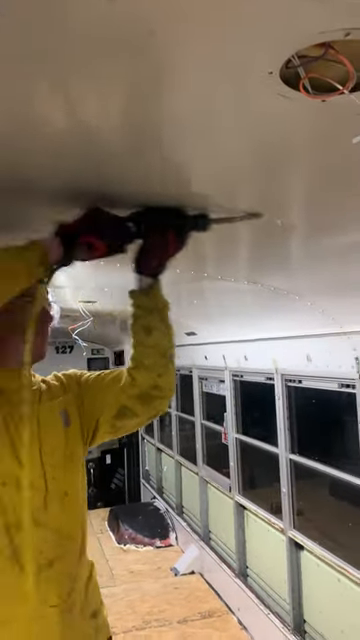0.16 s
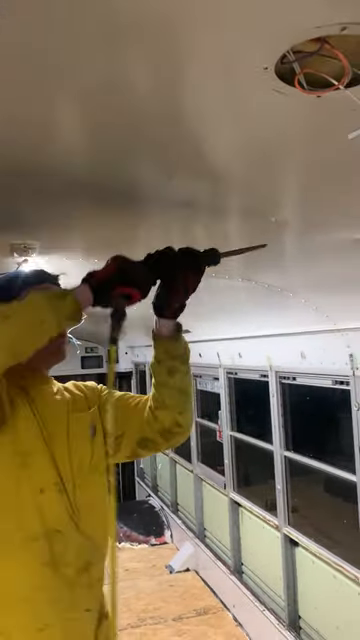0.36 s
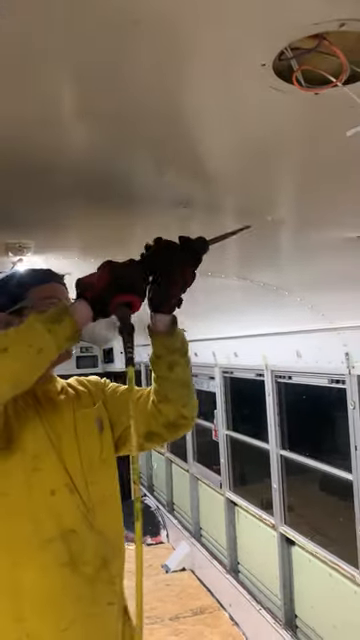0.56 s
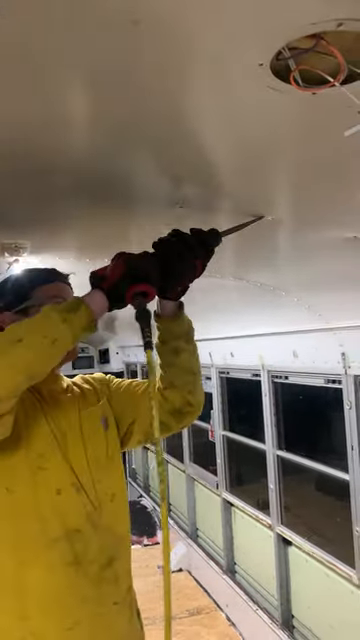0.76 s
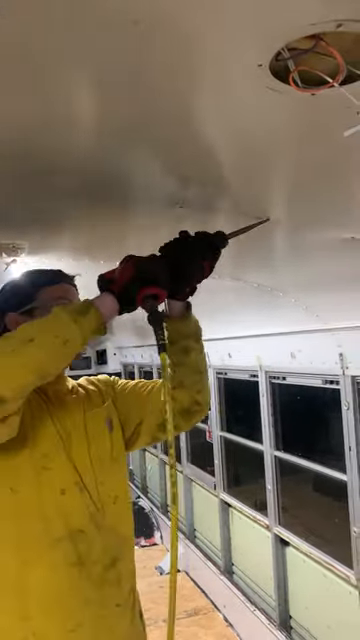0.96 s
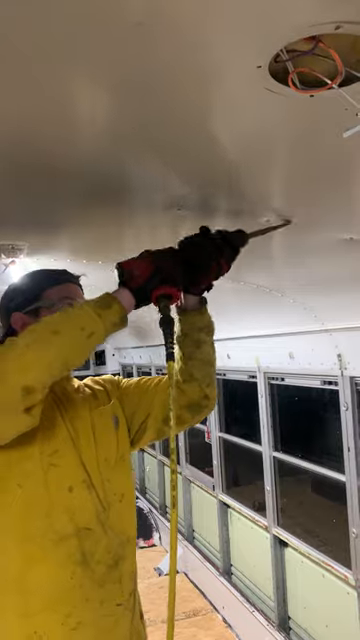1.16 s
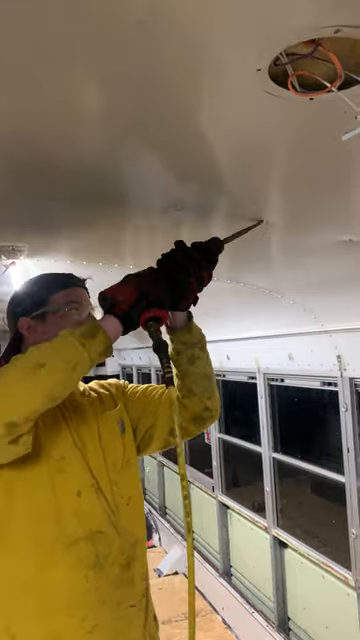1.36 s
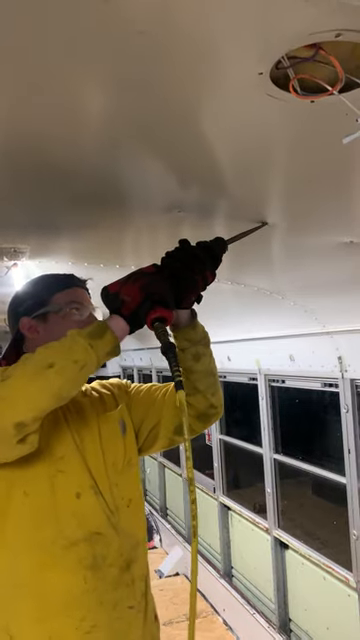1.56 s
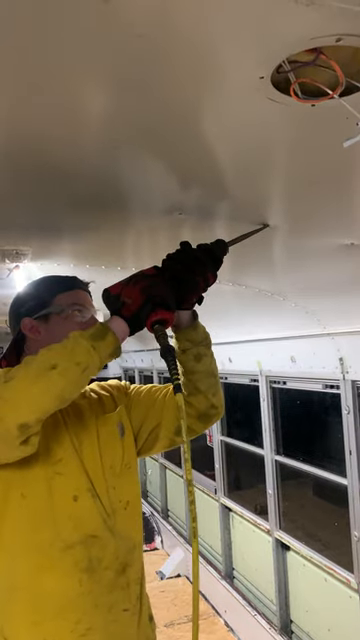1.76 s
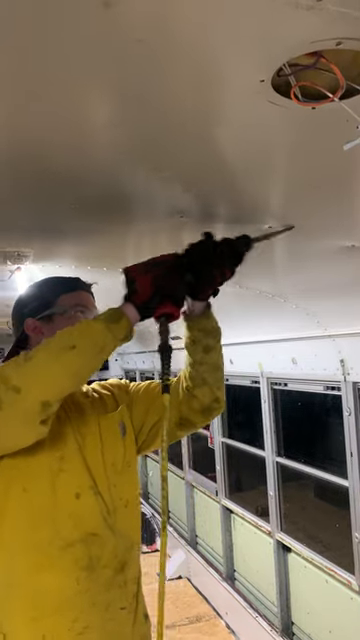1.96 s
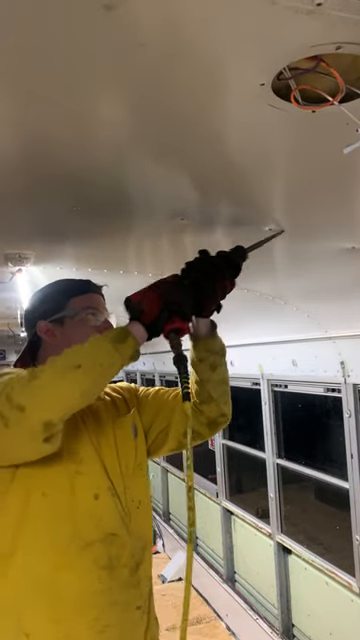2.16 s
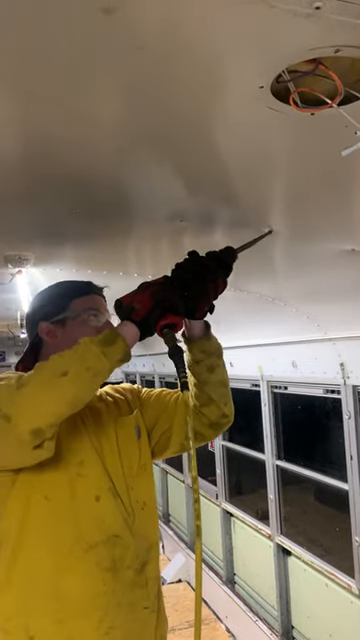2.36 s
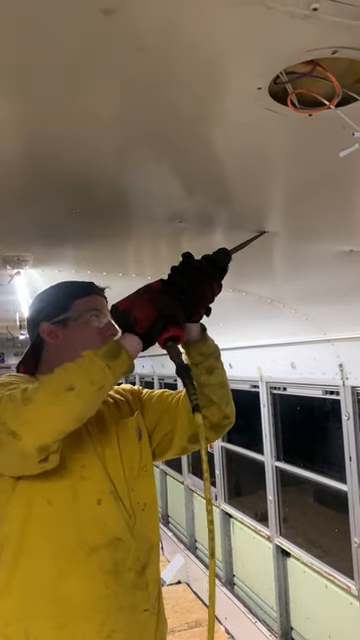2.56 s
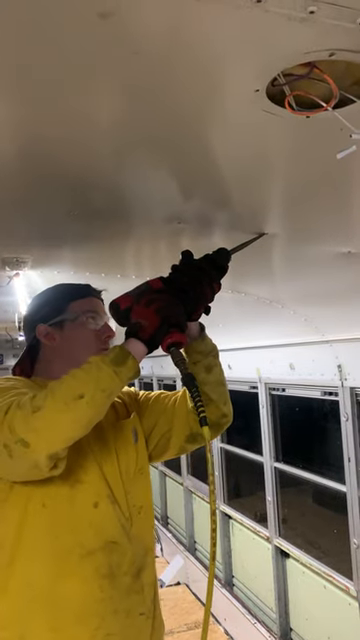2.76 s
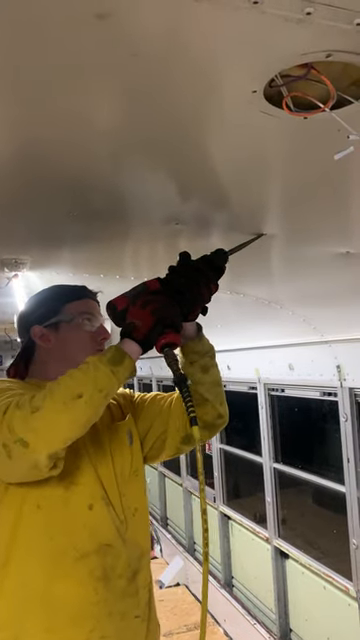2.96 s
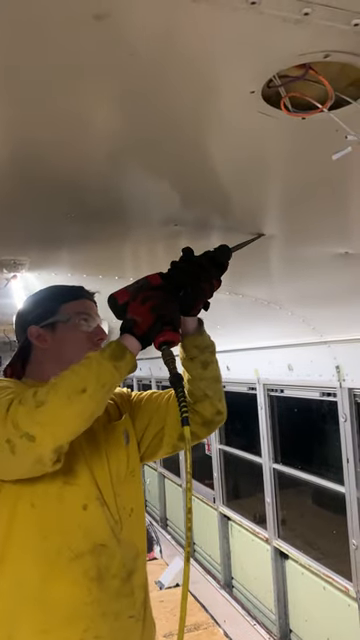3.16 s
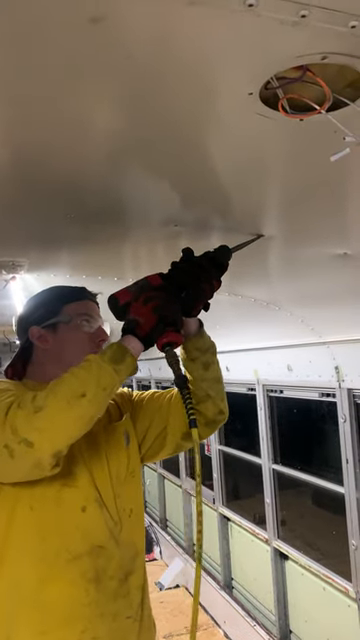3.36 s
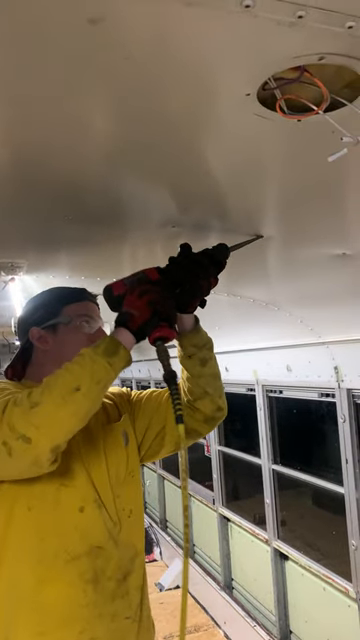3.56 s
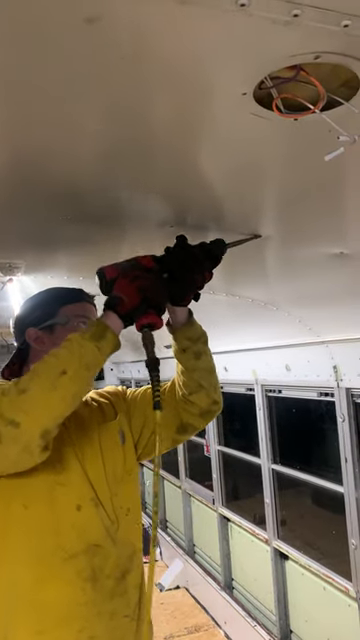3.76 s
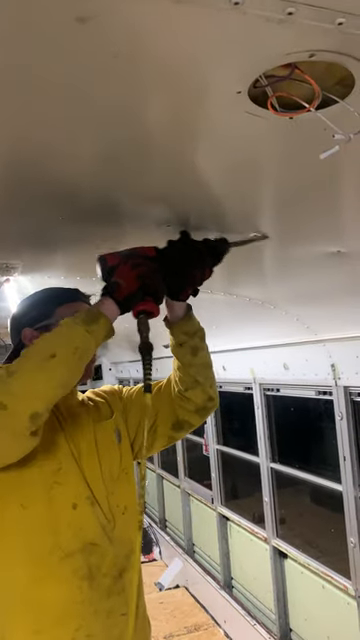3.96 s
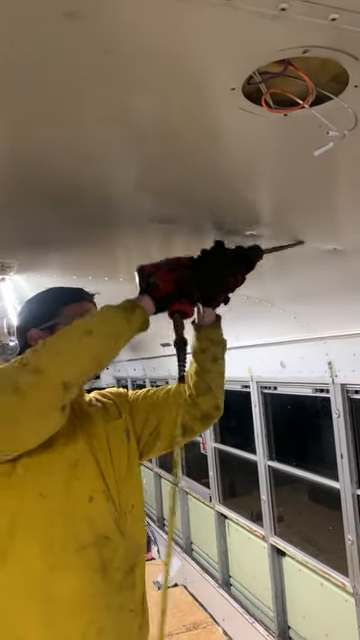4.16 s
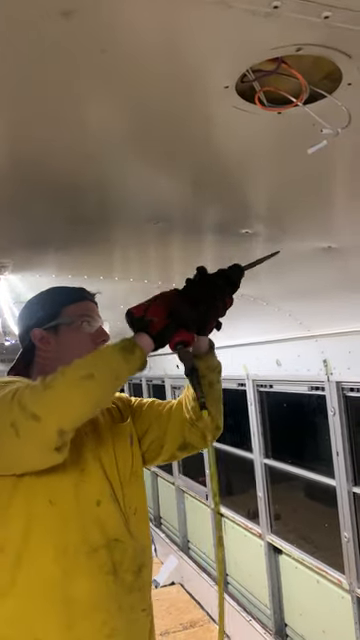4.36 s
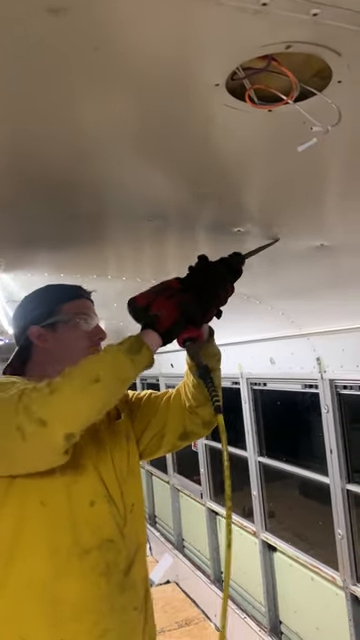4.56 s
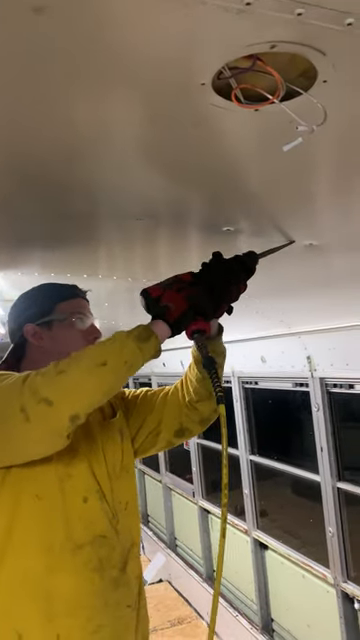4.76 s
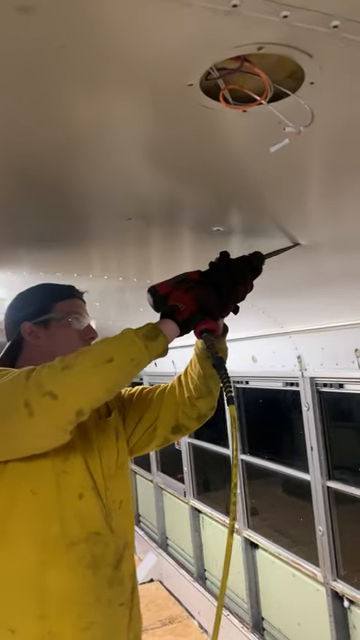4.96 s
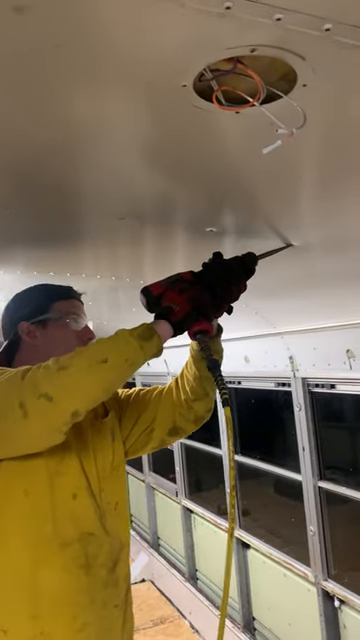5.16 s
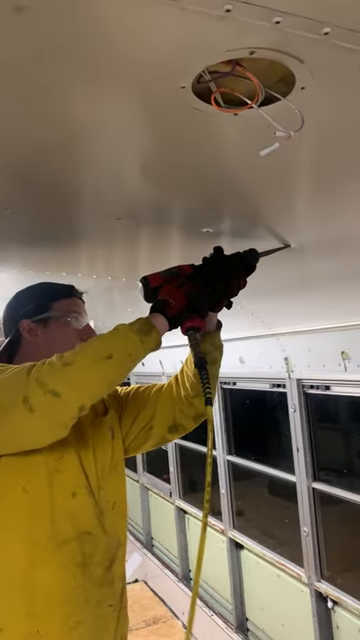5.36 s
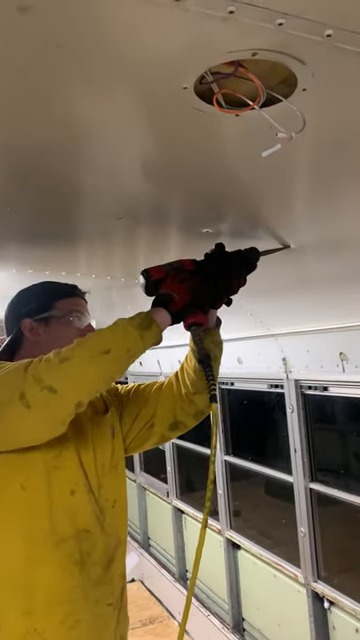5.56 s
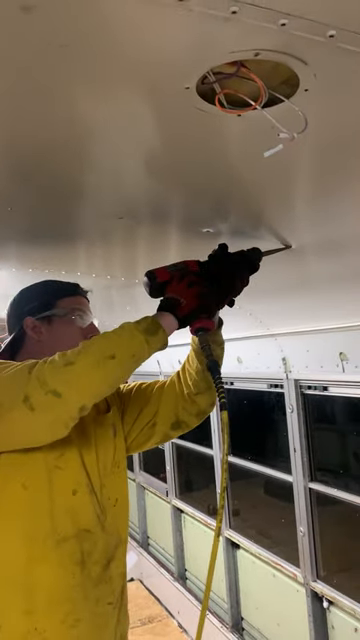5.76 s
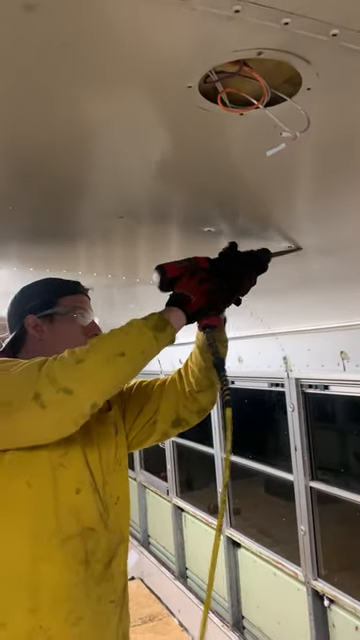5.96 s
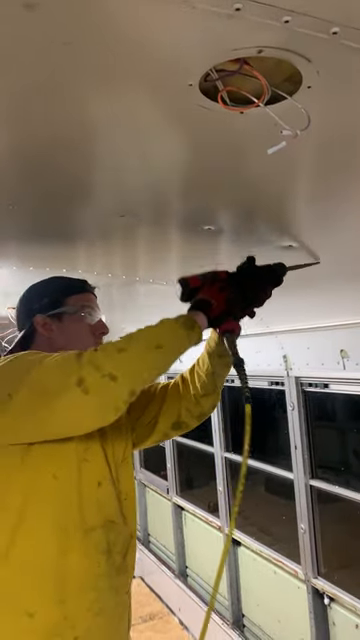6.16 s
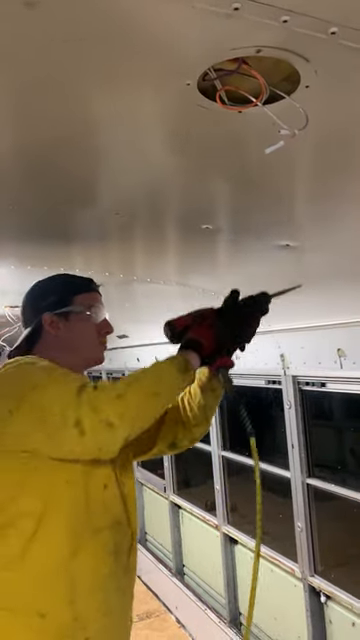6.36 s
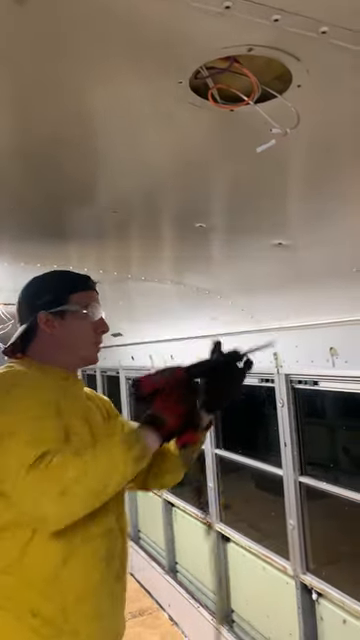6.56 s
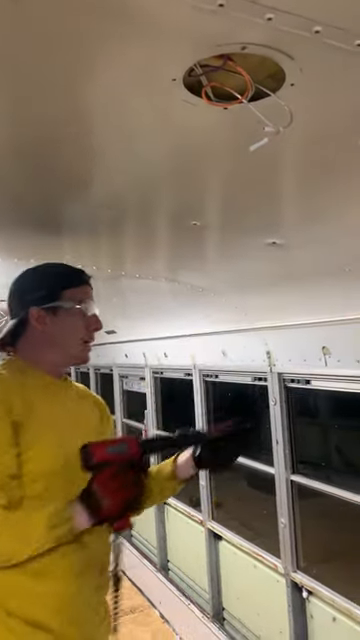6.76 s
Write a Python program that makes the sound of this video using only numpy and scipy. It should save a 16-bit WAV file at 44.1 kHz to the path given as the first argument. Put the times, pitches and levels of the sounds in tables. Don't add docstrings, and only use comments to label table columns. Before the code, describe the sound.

An air hammer rattles in harsh metallic bursts against a booming sheet-steel roof, with hisses, bit ticks and small metal pieces landing between.

```python
import sys
import numpy as np
from scipy import signal
from scipy.fft import rfft, irfft, next_fast_len
from scipy.io import wavfile
from scipy.ndimage import uniform_filter1d, map_coordinates

SR = 44100
rng = np.random.default_rng(int(sys.argv[2]) if len(sys.argv) > 2 else 0)


def undo_db(level):
    steps = np.asarray(level, float) / 20
    return 10 ** steps


def file_out(sig):
    cols = np.atleast_2d(sig).T
    lim = np.clip(cols, -1, 1)
    pcm = np.round(lim * 32767).astype(np.int16)
    wavfile.write(sys.argv[1], SR, pcm)


N = 300762
HOP = 64
STROKE_S = 0.033

# first blow in seconds, last blow in seconds, crack peak in dB,
# crack change in dB per blow, push on the roof in dB.
PULLS = [(0.159, 0.2161, -19.5, 1, -27), (3.457, 3.5586, -6, 0, -17.5), (3.6769, 3.8074, -6, -0.15, -19),
         (3.9207, 3.987, -4, 0, -18), (5.3643, 5.3935, -2, -2.5, -15.5), (5.664, 5.728, -2.5, -1, -16),
         (5.9288, 5.9962, -5.5, 0, -19)]
# time in seconds, crack peak in dB, push on the roof in dB.
STRAY_BLOWS = [(0.0489, -17, -21), (0.0828, -6, -19.5), (0.1218, -7, -19.5), (0.255, -15.5, -27.5),
               (1.8578, -22.5, -26), (1.8962, -12, -23.5), (1.9298, -12, -25.5), (1.9568, -5.5, -16.5),
               (1.9934, -6, -20.5), (2.0304, -15.5, -33), (2.0643, -14, -35.5), (3.1013, -31.5, -34.5),
               (3.1237, -28, -29), (3.1462, -10, -25.5), (3.1807, -7, -15.5), (3.2101, -8.5, -16.5),
               (3.2491, -12, -18.5), (3.6089, -11.5, -24), (4.0248, -12.5, -20), (4.151, -14, -25),
               (4.1908, -17, -40.5), (5.2599, -20.5, -29.5), (5.2861, -19, -32), (5.3034, -10.5, -22),
               (5.3336, -3.5, -12.5), (5.766, -11, -23), (5.892, -4.5, -15), (6.1399, -13.5, -22)]
# work begins in seconds, clang in dB above the push, drum in dB above the push.
RIVETS = [
    (0, -6, -7),
    (1.8, -5.5, -1),
    (3, -3, 0),
    (3.85, -4.5, -4),
    (5.2, -3, -15.5),
]
# frequency in Hz, level in dB.
CRACK = [(1500, -4.5), (3500, -7), (5200, 2.5), (6900, -3.5), (8600, 1.5), (10700, -2), (13500, -4),
         (15000, 9.5), (15400, 5.5), (15650, 10.5)]
# frequency in Hz, level in dB.
CLANG = [(250, -31), (500, -4.5), (1100, -4), (1600, -8), (2400, -10.5), (3300, -10.5), (5000, -26.5)]
# frequency in Hz, level in dB.
BOOM = [(42, -51), (62, -18), (93, -6.5), (130, -6), (160, -17), (200, -5), (330, -7.5), (450, -12.5),
        (900, -44.5)]
# frequency in Hz, level in dB, time to fall 60 dB in seconds.
PANELS = [(55, -23, 0.29), (89, -12.5, 0.53), (131.5, -1.5, 0.33), (244, -7, 0.043), (309.7, -3.5, 0.19),
          (355.5, -2.5, 0.1), (395.3, -5, 0.23)]
# frequency in Hz, level in dB, time to fall 60 dB in seconds.
DRUM = [(186.2, 1, 0.084), (218.8, 1, 0.074)]
# frequency in Hz, level in dB, time to fall 60 dB in seconds.
CHISEL = [(3670, -15.5, .04), (6600, -10.5, 0.034), (7500, -12.5, 0.013), (8540, -4, 0.036),
          (10400, 0.5, 0.033), (12270, 0, 0.039), (14500, 3, .03)]
# time in seconds, crack peak in dB, clang in dB above the crack,
# cabin share in dB, tone in Hz.
TICKS = [(0.528, -42, -42, -1, 8360), (0.5643, -47, -18.5, -1, 12500), (0.6908, -28, -16, -5.5, 7700),
         (1.1215, -53.5, -6, -4, 6680), (1.351, -51, -12, -5, 7510), (1.374, -50, -9, 0, 6530),
         (0.263, -24.5, -49, -20, 7500), (1.403, -46.5, -17.5, 3, 4110), (4.2556, -17, -20.5, -5.5, 4150),
         (4.5393, -45.5, -17.5, -2.5, 6800), (4.679, -38, -15, 3.5, 6540), (4.8457, -33.5, -19, -2.5, 6370),
         (5.0043, -46, -1, -15, 6720), (5.0994, -69, 1, 0, 12500), (5.1179, -51.5, -6.5, -5, 6080),
         (5.172, -39.5, -17, -9, 6840), (6.1974, -23.5, -40, -5.5, 7800)]
# time in seconds, crack peak in dB,
# rebound share from 0 to 1, cabin share in dB, tone in Hz.
HEADS = [
    (0.3611, -20, 0.1, -4, 11700),
    (4.0704, -11.5, 0.3, -7.5, 12900),
    (6.4476, -18.5, .9, -4, 6050),
]
# time in seconds, level in dB.
SCUFFS = [(0.8944, -68), (1.0214, -64.5), (1.085, -62.5)]
# frequency in Hz, level in dB.
TICK = [(1000, -20.5), (3000, -3), (6500, 1), (10000, 5.5), (13000, -1), (15500, -16.5)]
# time in seconds, boom peak in dB,
# clang in dB above the boom, crack in dB above the boom.
KNOCKS = [(0.693, -60.5, -5, 18), (0.772, -41, -6.5, -15), (0.948, -43.5, -8.5, -21.5),
          (1.127, -36.5, -17, -38), (1.355, -45.5, -6, 17), (1.409, -46.5, 2, -21), (1.6, -34.5, -9, -15),
          (2.699, -72, 7, -25.5), (2.715, -44.5, -7, -1), (4.539, -41.5, -3, -27),
          (4.679, -52.5, -18, 26.5), (4.844, -53, -5, 21), (4.965, -38.5, -1, 5.5), (6.446, -60, -4, 22)]
# frequency in Hz, level in dB.
KNOCK = [(300, -8), (600, -5.5), (1200, -3.5), (1550, -9), (1900, -23.5), (5000, -46.5)]
# time in seconds, peak in dB.
THUDS = [(0.049, -58.5), (0.779, -62), (1.146, -52.5), (1.403, -44.5), (1.979, -30), (2.201, -43),
         (4.049, -32.5), (4.2, -47), (4.329, -47.5), (4.598, -51), (5.002, -61.5)]
# start in seconds, level in dB, length in seconds.
PUFFS = [(0.033, -43, 0.0049), (1.838, -56.5, 0.015), (3.083, -56, 0.011), (3.113, -38, .015),
         (3.43, -34, 0.028), (4.124, -34.5, 0.01), (5.241, -52.5, 0.01), (5.274, -40, .015),
         (5.614, -35, 0.051)]
# frequency in Hz, level in dB.
AIR = [(2500, -10.5), (6500, -13), (8500, -11.5), (10800, -3.5), (13000, -16.5), (15500, -23.5)]
# frequency in Hz, time to fall 60 dB in seconds.
CABIN = [(50, 1.0), (120, 0.72), (250, 0.54), (1000, 0.51), (3500, 0.49), (9000, 0.36), (14000, 0.3),
         (15300, 0.13)]
# frequency in Hz, level in dB.
HUM = [(30, -13), (55, 1.5), (95, 1), (170, -18), (260, -28.5), (800, -32.5), (1400, -26.5), (2200, -34),
       (6000, -55), (12000, -63.5)]
# frequency in Hz, level in dB.
WHINE = [(1404, -79.5), (812, -92)]
# frequency in Hz, lead in radians.
LEAD = [(300, 0), (700, 1.3), (1100, 0), (1800, .4), (2300, 3.14), (5500, 3.15), (6300, 5.8), (7500, 6.5),
        (9000, 8.8), (9500, 9.3), (10300, 9.65), (12000, 12.4), (14200, 15.2), (15700, 16.3)]
# frequency in Hz, likeness from 0 to 1.
ALIKE = [(300, .8), (700, .35), (2200, .25), (2700, .68), (3300, .74), (3850, .1), (4600, .86), (5300, .84),
         (5900, .35), (7000, .92), (8600, .8), (9600, .99), (10200, .99), (11000, .8), (14000, .85),
         (14900, .995)]
# frequency in Hz, left minus right in dB.
TILT = [(50, -2), (230, -5.5), (700, 0)]


def hammer():
    s, db, push_db = blows()
    begins, clang_db, drum_db = np.transpose(RIVETS)
    rivet = np.searchsorted(begins, s, side="right") - 1
    luck = rng.standard_normal((len(s), 4))
    scatter_db = 0.5
    clang_db = push_db + clang_db[rivet] + scatter_db * luck[:, 0]
    drum_db = push_db + drum_db[rivet] + scatter_db * luck[:, 1]
    tone_hz = np.where(luck[:, 2] > 0, 6800, 12950) * (1 + 0.06 * luck[:, 3])

    crack = burst(s, db - 8.5, CRACK, rise=0.00013, t60=0.089, grit_db=5.5)
    crack = crack + snap(s, db + 5.5, CRACK) + snap(s + 0.0006, db - 1.5, CRACK)
    sizzle = burst(s, db - 7, CRACK, rise=0.00033, t60=0.08, grit_db=4.0)
    bounces = (s[:, None] + rng.uniform(0.001, 0.02, (len(s), 3))).ravel()
    chatter = burst(bounces, np.repeat(db - 15.0, 3), CRACK, rise=0.00028, t60=0.02, grit_db=1.5)
    sheet = burst(s, clang_db - 13.5, CLANG, rise=0.0022, t60=0.12, grit_db=-6.5)
    sheet = sheet + roof(spikes(s, clang_db - 7.5), CLANG, prompt_db=-1.5, prompt_t60=0.25)

    push = spikes(s, push_db - 12) + spikes(s + 0.01917, push_db - 21.5)
    boom = undo_db(-1) * roof(push, BOOM, prompt_db=0.5, prompt_t60=0.36) + undo_db(3) * panels(push, PANELS)
    boom = boom + panels(spikes(s, drum_db + 2.0), DRUM)
    bit = chisel(s, db - 13.0, tone_hz) * [[1], [0]]
    ring = [(s, db - 7.5, colour(CRACK)), (s, clang_db - 5.5, colour(CLANG))]
    return crack + sizzle + chatter + sheet + boom + bit, ring


def blows():
    rows = list(STRAY_BLOWS)
    for first, last, db, change_db, push_db in PULLS:
        k = np.arange(round((last - first) / STROKE_S) + 1)
        times = first + (last - first) * k / k[-1]
        crack_db = db + change_db * k - 3.5 * (k == 0)
        rows += zip(times, crack_db, push_db - 1 * (k == 0))
    return np.transpose(sorted(rows))


def chisel(times, db, tone_hz):
    t = np.arange(SR // 10) / SR
    mix = rng.standard_normal((len(times), len(CHISEL)))

    def ring(hz, t60):
        return undo_db(-60 * t / t60) * np.sin(2 * np.pi * hz * t) * (1 - np.exp(-t / 0.0015))

    out = 0
    for (hz, level, t60), strength in zip(CHISEL, mix.T):
        out = out + signal.fftconvolve(spikes(times, db + level + 5 * strength), ring(hz, t60))
    for s, size, hz in zip(times, undo_db(db + 12), tone_hz):
        out[round(s * SR):][:len(t)] += size * ring(hz, 0.014)
    return out[:N]


def roof(push, spectrum, prompt_db, prompt_t60):
    hz, t, z = signal.stft(noise(spectrum)[:, :SR], SR, nperseg=1024, noverlap=896)
    fade = undo_db(-60 * t / along(CABIN, hz)[:, None])
    answer = signal.istft(z * fade, SR, nperseg=1024, noverlap=896)[1]
    t = np.arange(answer.shape[1]) / SR
    prompt = 1 + undo_db(prompt_db - 60 * t / prompt_t60)
    answer = answer * prompt * (1 - np.exp(-t / 0.005))
    return signal.fftconvolve(push[None], answer, axes=1)[:, :N]


def panels(push, modes):
    t = np.arange(SR // 2) / SR
    ring = 0
    for hz, db, t60 in modes:
        ring = ring + undo_db(db - 60 * t / t60) * np.sin(2 * np.pi * (hz * t + rng.random((2, 1))))
    swelling = ring * (1 - np.exp(-t / 0.0027))
    return signal.fftconvolve(push[None], swelling, axes=1)[:, :N] * np.array([[1], [0.8]])


def ticks():
    rows = [(*row, 0.11) for row in TICKS]
    rows += [(s, db, -25, wet, hz, share) for s, db, share, wet, hz in HEADS]
    s, db, clang, wet, tone_hz, rebound = np.transpose(rows)
    tick = 0
    for lag, drop in [(0, -0.5), (0.0009, 3), (0.0027, -3.5), (0.0036, 0.5)]:
        tick = tick + burst(s + lag, db + drop, TICK, rise=0.0003, t60=0.0046, grit_db=1.0)
    scrape = burst(s - 0.012, db - 23, AIR, rise=0.023, t60=0.11, grit_db=7.0)
    contact = snap(s, db + 6, TICK) + snap(s + 0.00083, db + 4.5, TICK)
    steel = colour([(800, -9.5), (2200, -1.5), (4500, 1), (8000, -31)])

    def comb(hz):
        return abs(1 + np.clip(rebound, 0, 1) * np.exp(2j * np.pi * hz * 0.0011))

    def bright(hz):
        tone = 0.8 / (1 + ((hz - tone_hz) / 1200) ** 2)
        return comb(hz) / (1 + (hz / 9000) ** 2) * (colour(TICK)(hz) + tone)

    def body(hz):
        return comb(hz) * steel(hz)

    ring = [(s, db - 15.5 + wet, bright), (s, db + clang + 5.5 + wet, body)]
    return tick + scrape + contact, ring + [(*np.transpose(SCUFFS), steel)]


def knocks():
    s, db, clang, crack = np.transpose(KNOCKS)
    knock = burst(s, db + clang - 9.0, KNOCK, rise=0.0019, t60=0.021, grit_db=6)
    knock = knock + roof(spikes(s, db - 14), BOOM, prompt_db=-18, prompt_t60=0.1)
    knock = knock + panels(spikes(s, db - 12.5), PANELS + DRUM)
    t = np.arange(SR // 2) / SR
    floor = np.sin(2 * np.pi * 52 * t) * undo_db(-60 * t / 0.51) * (1 - np.exp(-t / 0.017))
    thud = signal.fftconvolve(spikes(*np.transpose(THUDS)), undo_db(7.5) * floor)[:N] * np.array([[1], [0]])
    treble = colour([(1500, -3), (3500, -1), (7000, -6.5), (14000, -46)])
    return knock + thud, [(s, db + clang - 6.0, colour(KNOCK)), (s, db + crack - 25, treble)]


def puffs():
    t = np.arange(N) / SR
    flow = 0
    for s, db, length in PUFFS:
        fade = undo_db(-60 * np.maximum(t - s - length, 0) / 0.083)
        flow = flow + undo_db(db) * np.clip((t - s) / 0.01, 0, 1) * fade
    return flow * noise(AIR)


def cabin(feeds, build):
    hz, t, z = signal.stft(rng.standard_normal((2, N)), SR, nperseg=4 * HOP, noverlap=3 * HOP)
    energy = np.zeros(z.shape[1:])
    for times, db, gain in feeds:
        shape = gain(hz[:, None]) ** 2
        frame = np.round(times * SR / HOP).astype(int) + 1
        np.add.at(energy.T, frame, (shape / shape.mean(0) * undo_db(2 * db)).T)
    keep = np.exp(-HOP / SR / build)
    energy = signal.lfilter([1 - keep], [1, -keep], energy)
    decay = undo_db(-120 * HOP / SR / along(CABIN, hz))
    energy = np.array([signal.lfilter([1], [1, -d], e) for e, d in zip(energy, decay)])
    return signal.istft(z * np.sqrt(energy), SR, nperseg=4 * HOP, noverlap=3 * HOP)[1][:, :N]


def idle():
    t = np.arange(N) / SR
    swell = map_coordinates(rng.standard_normal(60), [t * 7])
    tones = sum(undo_db(db - 0.5) * np.sin(2 * np.pi * hz * t) for hz, db in WHINE)
    return undo_db(-67.5 + 2 * swell) * noise(HUM) + tones * [[1], [0]]


def burst(times, db, spectrum, rise, t60, grit_db):
    t = np.arange(int(2 * t60 * SR)) / SR
    envelope = (1 - np.exp(-t / rise)) * undo_db(-120 * t / t60)
    energy = signal.fftconvolve(spikes(times, 2 * db), envelope)[:N]
    grit = np.repeat(rng.standard_normal(N // 16 + 1), 16)[:N]
    grit = np.clip(grit, -3, 2.6)
    return noise(spectrum) * np.sqrt(np.maximum(energy, 0)) * undo_db(grit_db * grit)


def snap(times, db, spectrum):
    return filtered(spikes(times, db), colour(spectrum)) * [[1], [0]]


def spikes(times, db):
    return np.bincount(np.round(times * SR).astype(int), undo_db(db), N)


def noise(spectrum):
    x = filtered(rng.standard_normal((2, N)), colour(spectrum))
    return x / x.std()


def colour(spectrum):
    return lambda hz: undo_db(along(spectrum, hz))


def along(points, hz):
    f, v = np.transpose(points)
    return np.interp(np.log(hz + 1), np.log(f + 1), v)


def filtered(x, response):
    m = next_fast_len(N + 8192)
    return irfft(rfft(x, m) * response(np.fft.rfftfreq(m, 1 / SR)), m)[..., :N]


def scene():
    parts = [hammer(), ticks(), knocks()]
    direct = sum(sound for sound, ring in parts)
    feeds = sum((ring for sound, ring in parts), [])
    return direct + cabin(feeds, build=0.00095) + puffs() + idle()


def top_cut(x):
    return signal.sosfilt(signal.butter(12, 16970, fs=SR, output="sos"), x)


def record(dry):
    z = signal.stft(dry[1], nperseg=512)[2]
    field = uniform_filter1d(uniform_filter1d(rng.standard_normal(z.shape), 9, 0), 11, 1)
    loud = np.tanh(uniform_filter1d(abs(z).mean(0), size=12) / undo_db(-52.0))
    gate = 1 / (1 + np.exp(12 * (field / field.std() + 1.8 * loud - 1.65)))
    band = np.fft.rfftfreq(512, 1 / SR)
    gate[(band < 2200) | (along(ALIKE, band) < 0.55)] = 1
    gated = signal.istft(z * gate, nperseg=512)[1][:N]

    def blend(hz):
        turn = np.arccos(np.clip(along(ALIKE, hz), 0, 1)) / 2
        return np.array([np.cos(turn), np.sin(turn)])

    def sides(hz):
        left = undo_db(along(TILT, hz) / 2) * np.exp(0.5j * along(LEAD, hz))
        bass_cut = (1j * hz / (45 + 1j * hz)) ** 2
        treble_cut = 1 / (1 + np.exp(np.clip((hz - 15800) / 40, -50, 7)))
        return bass_cut * treble_cut * np.array([left, 1 / left])

    shared, apart = filtered(np.array([dry[0], gated]), blend)
    pair = filtered(np.array([shared + apart, shared - apart]), sides)
    pair = pair / (1 + abs(pair / 0.9) ** 4) ** (1 / 4)
    return top_cut(pair)


dry = scene()
out = record(dry)
file_out(out)
```